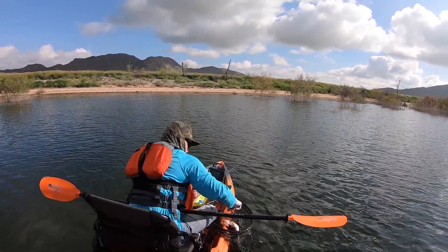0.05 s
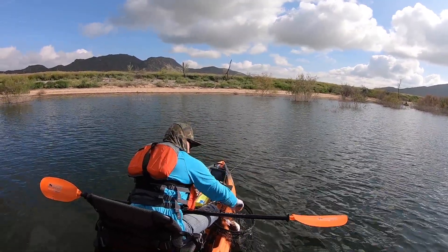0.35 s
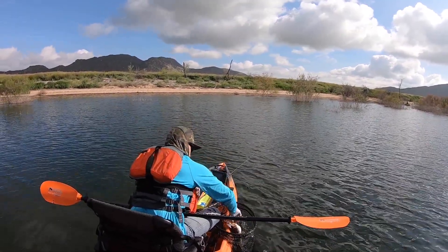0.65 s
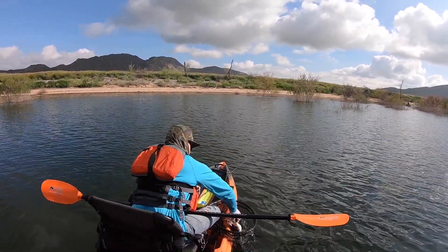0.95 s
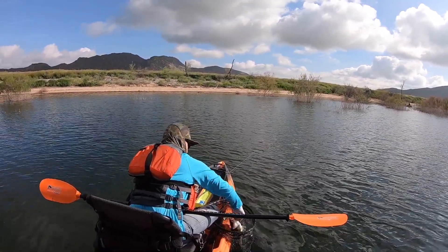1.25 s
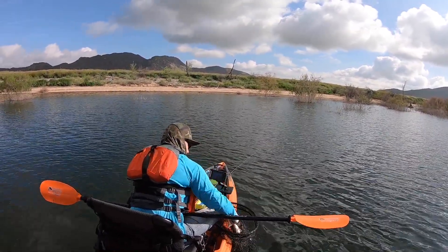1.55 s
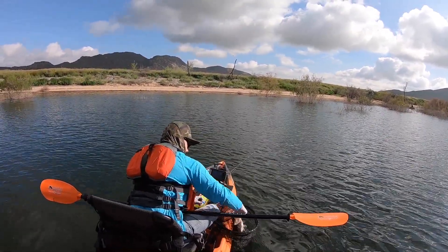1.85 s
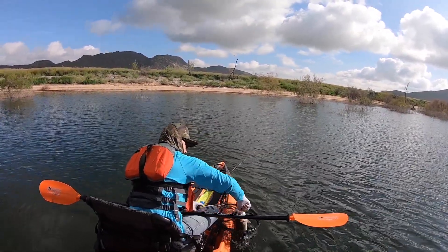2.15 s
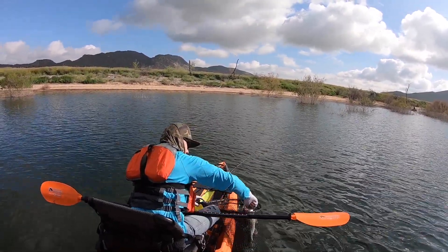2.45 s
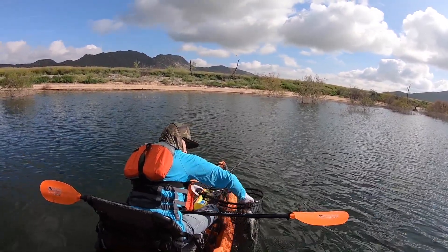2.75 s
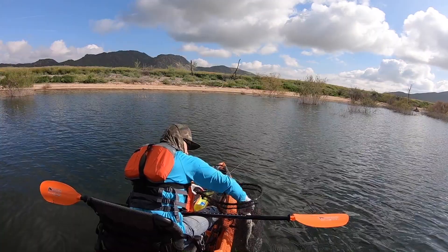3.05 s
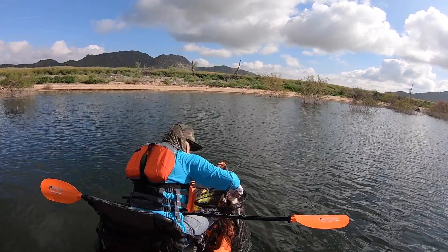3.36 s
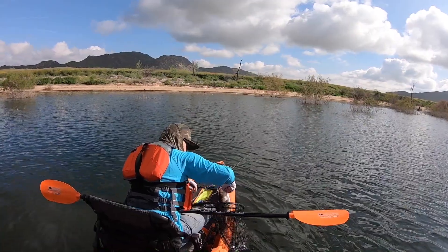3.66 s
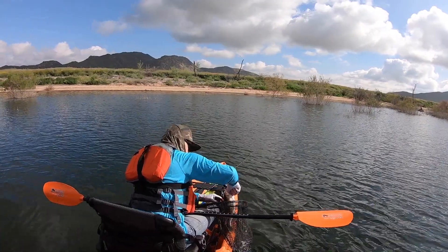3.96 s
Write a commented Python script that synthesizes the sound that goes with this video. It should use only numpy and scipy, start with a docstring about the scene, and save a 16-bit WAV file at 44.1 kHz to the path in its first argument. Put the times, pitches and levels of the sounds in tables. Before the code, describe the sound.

Gear thumps onto a hollow plastic kayak hull near the end, booming and rattling as it bounces. Before that, wind rumbles on the microphone over a low motor hum, with faint ripples, small clicks and distant birds on a lake.

```python
"""Wind rumbles on the microphone over a low, steady motor hum, as a kayak drifts on a lake.
Ripples lap at the hull, a hand splashes, and tiny bubbles ring. Metal tackle clinks, plastic clicks,
a sleeve swishes, and far birds chirp and trill. Near the end comes the loudest sound: a piece of gear
drops on the hollow plastic hull, which booms and rattles as the gear bounces and settles."""
import sys
import numpy as np
from scipy import signal
from scipy.fft import rfft, irfft
from scipy.io import wavfile
from scipy.ndimage import uniform_filter1d

SR = 44100
rng = np.random.default_rng(int(sys.argv[2]) if len(sys.argv) > 2 else 0)


def generate_wav(sig):
    """Save sig (samples, or channels by samples) to the path in sys.argv[1] as 16-bit PCM at SR."""
    pcm = np.round(np.clip(np.atleast_2d(sig).T, -1, 1) * 32767).astype(np.int16)
    wavfile.write(sys.argv[1], SR, pcm)


N = 176400
GEAR_SIDE_DB, WATER_SIDE_DB = -7.5, -11.5  # stereo width: lower is narrower


# The hull's own tones. Each row: pitch in Hz, level in dB, seconds to die away.
HULL_TONES = [(58, -19.5, 1), (86.2, -19, 0.99), (92.8, -14, 0.57), (113.1, 4.5, 0.32), (131.4, -6, 0.27),
              (148.6, -10, 0.41), (194.8, 3.5, 0.14), (235.6, -1.1, 0.092), (266.7, -9.5, 0.15),
              (420, -10.5, 0.1), (445, -0.5, 0.084), (494, -9.5, 0.12), (602, -14.5, 0.13),
              (900.6, -4.5, 0.081)]
# Blows on the hull. Each row: start in seconds, thump in dB, contact time in ms, rattle in dB,
# pitch in Hz that the struck spot favours, dB by which tones far from that pitch are weaker.
BLOWS = [(1.486, -28, 0.99, -49.5, 430, 9.5), (1.507, -35, 0.43, -56.5, 350, 11.5),
         (3.6423, -1, 1.24, -24.5, 121, 1.3), (3.654, -2, 4.3, -38, 99, -0.5),
         (3.6883, 0.2, 0.6, -27, 272, 12), (3.8549, -27, 2.6, -59.5, 91, 9.5),
         (3.9113, -12, 2.15, -60, 199, 13), (3.9444, -17, 3.6, -62, 93, 8)]

def hull():
    """Each blow makes the hollow shell ring, mostly at the tones of the struck spot, and rattle."""
    out, t = np.zeros((2, N)), np.arange(32768) / SR
    tone_rise_s, rattle_rise_s, spot_octaves = 0.0045, 0.00199, 0.52
    tones = np.array([undb(db) * fade(t, s) * np.sin(2 * np.pi * hz * t) for hz, db, s in HULL_TONES])
    tones *= 1 - np.exp(-t / tone_rise_s)
    tones = signal.sosfilt(signal.butter(3, 57, "high", fs=SR, output="sos"), tones)
    for at, db, contact_ms, rattle_db, spot_hz, weaker_db in BLOWS:
        near = bell(np.array(HULL_TONES)[:, 0], spot_hz, spot_octaves)
        ring = undb(weaker_db * (near - 1.5)) @ tones
        deep = signal.sosfilt(signal.butter(2, 63.6, fs=SR, output="sos"), ring)
        push = t * fade(t, 2 * contact_ms / 1000)  # a longer push sounds duller
        thump = signal.fftconvolve(stereo((ring, deep), side_db=-2), push[None] / push.sum())
        add(out, at, -undb(db) * thump[:, :len(t)])
        add(out, at - rattle_rise_s, undb(rattle_db) * rattle(t, rattle_rise_s))
    return out


# The rattle's bands. Each row: frequency in Hz, level in dB, seconds to die away.
RATTLE_BANDS = [(269, -20, 0.2), (362, -15.5, 0.094), (533, 6, 0.18), (890, 3, 0.15), (1160, -3, 0.12),
                (1350, 9, 0.035), (1600, -4.5, 0.092), (1930, 1, 0.079), (3270, -9, 0.056),
                (4740, -25, 0.11), (8060, -42.5, 0.092), (13500, -67, .06)]

def rattle(t, rise_s):
    """Hull and gear ring at so many pitches that they blur into noise; loose gear buzzes on."""
    spectrum = rfft(colour(noise(side_db=-12.5, size=len(t)), RATTLE_BANDS))
    log_hz, centres = np.log(frequencies(len(t))), np.log(np.array(RATTLE_BANDS)[:, 0])
    tail = undb(-23) * fade(t, 0.35)
    ring = 0
    for (_, _, ring_s), this_band in zip(RATTLE_BANDS, np.eye(len(centres))):
        share = np.interp(log_hz, centres, this_band)
        ring += irfft(spectrum * share) * rise(t, rise_s) * (fade(t, ring_s) + tail)
    buzz = band(noise(side_db=-12.5, size=len(t)), hz=2080, octaves=0.21)
    return ring + undb(-25.5) * buzz * fade(t, 0.34)


# Plastic clicks. Each row: start in seconds, level in dB, centre pitch in Hz.
PLASTIC_CLICKS = [(.173, -63, 750), (.225, -60, 1390), (0.8233, -62, 4140), (1.159, -60, 3320),
                  (1.2335, -66, 2280), (1.342, -62, 6400), (1.395, -61.5, 6260), (1.4841, -33, 3240),
                  (1.508, -55, 4130), (1.584, -69, 5450), (1.611, -59.5, 7400), (1.9, -67, 7000),
                  (2.36, -54, 4000), (2.377, -56, 5000), (3.371, -71, 5800), (3.421, -69, 5500),
                  (3.6377, -39, 3560), (3.643, -32, 2430)]

def clicks():
    """Hard plastic gives a dry snap of noise with a faint tail."""
    out, t = np.zeros((2, N)), np.arange(8192) / SR
    rise_s = 0.0024
    snap = fade(np.maximum(t - rise_s, 0), 0.012)
    shape = rise(t, rise_s) * (snap + undb(-18) * fade(t, 0.12))
    for at, db, hz in PLASTIC_CLICKS:
        add(out, at, undb(db) * shape * band(noise(GEAR_SIDE_DB, len(t)), hz, octaves=0.78))
    return out


# The metal's own tones. Each row: pitch in Hz, level in dB, seconds to die away.
TACKLE_TONES = [(4380, -5, 0.034), (5270, -19, .03), (6440, 6.5, 0.066), (7130, 4, .03), (8150, 0, 0.058),
                (9500, 0, 0.046), (12000, -1.5, 0.075), (12400, -9, 0.035)]
# Metal clinks. Each row: start in seconds, level in dB, a factor on the tones' ring time.
TACKLE_CLINKS = [(.1794, -69.5, 1.3), (0.2263, -65, 1.2), (0.2628, -54, 1.3), (0.2734, -66, 1.1),
                 (.3242, -61, .6), (0.3417, -58, .6), (.349, -63, .5), (.4015, -63, .7), (0.414, -66, .7),
                 (.4499, -70, .7), (0.5172, -58.5, .6)]

def tackle():
    """Small metal pieces tick and ring brightly, a little differently each time."""
    out, t = np.zeros((2, N)), np.arange(8192) / SR
    scatter_db, detune = 1.5, 0.018
    for at, db, stretch in TACKLE_CLINKS:
        ring = 0
        for hz, tone_db, ring_s in TACKLE_TONES:
            gain = undb(tone_db + scatter_db * rng.standard_normal((2, 1)))
            phase = 2 * np.pi * hz * (1 + detune * rng.normal()) * t + rng.normal(size=(2, 1))
            ring += gain * fade(t, stretch * ring_s) * np.sin(phase)
        tick = band(noise(side_db=-11.5, size=len(t)), hz=5300, octaves=0.9) * fade(t, 0.071)
        add(out, at, undb(db) * rise(t, 0.0028) * (ring + undb(-1) * tick))
    return out


# Single drips. Each row: start in seconds, level in dB, starting pitch in Hz.
DRIP_NOTES = [(1.004, -42, 3730), (1.015, -49, 2850), (1.612, -44, 7460), (1.975, -62, 2270),
              (2.361, -55, 2210), (2.381, -46, 2500), (2.385, -63, 3500), (2.659, -67.5, 1880),
              (2.872, -58.5, 3000), (3.014, -65, 1620), (3.186, -57.5, 3440), (3.908, -60.5, 2100)]

def drips():
    """Tiny bubbles ring and rise a little in pitch."""
    out = np.zeros((2, N))
    cycles, pitch_gain = 84, 0.26
    for at, db, hz in DRIP_NOTES:
        length = cycles / hz
        t = clock(length)
        ring = np.sin(2 * np.pi * hz * t * (1 + pitch_gain / 2 * t / length))
        add(out, at, undb(db) * rise(t, 0.00046) * fade(t, length) * ring)
    return out


# The tone colour of the ripples. Each row: frequency in Hz, level in dB.
RIPPLE_COLOUR = [(400, -1), (800, -1), (1400, -2), (2200, 3), (3600, 3), (5000, -5), (7500, -4.5),
                 (10000, -26), (14000, -28)]
# How loud the ripples are. Each row: time in seconds, level in dB.
RIPPLE_LOUDNESS = [(0, -74.5), (.15, -77.5), (1.2, -78), (1.45, -67.5), (1.55, -65.5), (1.68, -82.5),
                   (1.95, -74), (2.1, -86), (2.7, -93.5), (3.0, -74), (3.12, -84), (3.4, -64), (3.8, -89)]

def water():
    """Many tiny droplets make the trickling ripples; swells and splashes join them."""
    drops_per_s, spread_db = 1800, 3.2
    hits = rng.random(N) < drops_per_s / SR
    sizes = undb(spread_db * np.minimum(rng.exponential(size=N), 4))
    drops = hits * sizes * noise(WATER_SIDE_DB)
    ripples = colour(drops, RIPPLE_COLOUR) * curve(RIPPLE_LOUDNESS) * undb(0.63 * wander(25))
    return ripples + swells() + splashes(drops)


# Splashes. Each row: peak time in seconds, half-length in seconds, level in dB, centre pitch in Hz.
HAND_SPLASHES = [(0.182, 0.033, -65.5, 586), (0.749, 0.011, -60.5, 3580), (1.002, 0.0068, -80, 4300),
                 (1.015, 0.028, -64.5, 2390), (1.99, 0.015, -74, 2380), (2.379, 0.067, -59, 2580),
                 (2.88, 0.01, -77, 3030), (3.018, 0.0098, -62.5, 2400), (3.171, 0.026, -71.5, 3500)]

def splashes(drops):
    """A hand in the water throws up short sprays of droplets."""
    out = np.zeros((2, N))
    for at, half_s, db, hz in HAND_SPLASHES:
        first = int(max(at - half_s, 0) * SR)
        spray = band(drops[:, first:first + 8192], hz, octaves=0.64)
        shape = np.hanning(int(2 * half_s * SR)) ** 2
        add(out, at - half_s, undb(db) * spray[:, :len(shape)] * shape)
    return out


# The tone colour of the murmur. Each row: frequency in Hz, level in dB.
MURMUR_COLOUR = [(900, -26.5), (1200, -4.5), (1400, 4.5), (1550, -15.5), (1900, -27)]
# Its swells. Each row: peak time in seconds, length in seconds, level in dB.
MURMUR_SWELLS = [(0.624, 0.11, -79), (0.983, 0.13, -75), (1.717, 0.21, -71.5), (2.415, 0.27, -69.5),
                 (2.9, 0.22, -76), (3.528, 0.48, -68.5)]

def swells():
    """A soft murmur of air and water comes and goes."""
    t = np.arange(N) / SR
    level = sum(undb(db) * np.exp(-4 * ((t - at) / length) ** 2) for at, length, db in MURMUR_SWELLS)
    return colour(noise(WATER_SIDE_DB), MURMUR_COLOUR) * level


# Swishes. Each row: peak time in seconds, half-length in seconds, level in dB, centre pitch in Hz,
# width in octaves.
SLEEVE_SWISHES = [(1.245, 0.033, -69, 1890, 0.41), (1.37, 0.033, -60, 1440, 0.59),
                  (1.378, 0.052, -68, 6200, 0.36), (1.472, 0.027, -65, 3180, 1.1),
                  (2.359, 0.072, -66, 4150, 0.65), (3.378, 0.056, -64, 2180, 1.16),
                  (3.483, 0.042, -68, 2390, 0.65), (3.573, 0.085, -66.5, 2770, 0.79),
                  (3.6, 0.025, -71.5, 4200, .07)]

def sleeve():
    """A sleeve brushes over the gear in smooth swishes."""
    out = np.zeros((2, N))
    for at, half_s, db, hz, octaves in SLEEVE_SWISHES:
        shape = np.hanning(int(2 * half_s * SR))
        rub = band(noise(GEAR_SIDE_DB, size=16384), hz, octaves)
        add(out, at - half_s, undb(db) * rub[:, :len(shape)] * shape)
    return out


# Chirps. Each row: start in seconds, length in seconds, first and last pitch in Hz, level in dB.
BIRD_CHIRPS = [(.1, 0.053, 6900, 7450, -68.5), (0.343, 0.038, 4490, 5800, -64.5),
               (0.38, 0.043, 3790, 3870, -64.5), (0.542, 0.023, 4550, 4660, -67),
               (0.565, 0.021, 3030, 3400, -67), (0.59, 0.019, 3770, 3880, -59.5),
               (0.674, 0.067, 4200, 4230, -69), (0.742, 0.048, 4880, 4540, -59.5),
               (0.791, 0.047, 3660, 3470, -68), (0.996, 0.072, 3860, 3750, -69)]

def songbirds():
    """Thin chirps and fainter, more distant twitters, blurred by the echo from the shore."""
    out, t = np.zeros((2, N)), np.arange(16384) / SR
    for at, length, from_hz, to_hz, db in BIRD_CHIRPS:
        add(out, at, undb(db) * whistle(length, from_hz, to_hz))
    for at, hz, size in rng.uniform((0.3, 3400, 0.5), (0.8, 5200, 1.5), size=(16, 3)):
        add(out, at, undb(-80) * size * whistle(0.05, hz, 0.8 * hz))
    echo = rng.standard_normal((2, len(t))) * fade(t, 0.091)
    return out + signal.fftconvolve(out, echo / np.linalg.norm(echo[0]), axes=1)[:, :N]


# The pips of a trill. Each row: peak time in seconds, level in dB.
TRILL_PIPS = [(1.665, -57), (1.741, -59), (1.784, -56.5), (1.832, -61), (1.871, -60), (1.91, -58.5),
              (1.95, -64), (1.992, -64), (2.03, -61.5), (2.067, -70), (2.105, -63.5), (2.141, -64),
              (2.177, -63), (2.214, -68), (2.252, -66), (2.289, -64), (2.366, -63), (2.404, -64),
              (2.441, -65), (2.477, -62), (2.515, -62), (2.553, -62), (2.589, -63), (2.626, -59)]

def trilling_bird():
    """A far bird repeats a short falling pip, and the whole trill sinks in pitch."""
    out = np.zeros((2, N))
    start_hz, end_hz, settle_s, pip_s, fall = 966, 824, 0.21, 0.013, 0.079
    for at, db in TRILL_PIPS:
        hz = end_hz + (start_hz - end_hz) * np.exp(-(at - TRILL_PIPS[0][0]) / settle_s)
        pip = whistle(pip_s, hz * (1 + fall), hz * (1 - fall), arch=0, rough=0)
        add(out, at - pip_s / 2, undb(db) * pip)
    return out


# Tone colours of the rumble both ears share, the rumble that differs between them, and the hiss.
# Each row: frequency in Hz, level in dB.
RUMBLE_COLOUR = [(12, -15), (28, -4.5), (65, -1.5), (120, -3.5), (200, -9), (290, -17), (380, -25),
                 (550, -36.5), (800, -48.5), (2000, -74)]
RUMBLE_SIDE_COLOUR = [(12, -15), (28, -10.5), (55, -16), (90, -13), (140, -18.5), (250, -24), (500, -35.5),
                      (2000, -48.5)]
HISS_COLOUR = [(300, 7), (750, -5.5), (1000, -0.5), (1350, 2.5), (2000, -8.5), (4000, -8), (6000, -8.5),
               (8000, -4), (9300, -13.5), (11000, -19.5), (14000, -32.5)]
# How loud the rumble is. Each row: time in seconds, level in dB.
RUMBLE_LOUDNESS = [(0, -44.5), (.6, -44.5), (1.25, -48), (1.55, -43), (1.95, -44), (2.5, -46), (2.85, -42),
                   (3.15, -43.5), (3.62, -40.5), (3.8, -38.5), (4, -36)]

def wind():
    """Gusts rumble on the microphone, with the thin hiss of open air above them."""
    middle = colour(rng.standard_normal(N), RUMBLE_COLOUR)
    side = colour(rng.standard_normal(N), RUMBLE_SIDE_COLOUR)
    gusts = curve(RUMBLE_LOUDNESS) * undb(1.3 * wander(5.77))
    hiss = undb(-68.5) * colour(noise(side_db=-1), HISS_COLOUR)
    return stereo((middle, side), side_db=-10) * gusts + hiss


# The motor's tones. Each row: multiple of the shaft's turning rate, early and late level in dB.
MOTOR_TONES = [(4, -50, -49), (8, -43.5, -39.5), (10, -52.5, -59.5), (15, -60, -63), (16, -49.5, -52.5),
               (17, -61.5, -68), (18, -60, -63.5)]

def motor():
    """A turning shaft hums in wavering tones, whose balance shifts partway through."""
    shaft_hz, drift, waver_db, shift_span_s = 17.78, 0.0011, 0.5, (1.48, 2)
    angle = 2 * np.pi * np.cumsum(shaft_hz * (1 + drift * wander(3.05))) / SR
    hum, t = np.zeros(N), np.arange(N) / SR
    for multiple, early_db, late_db in MOTOR_TONES:
        db = np.interp(t, shift_span_s, (early_db, late_db)) + waver_db * wander(4.51)
        hum += np.sqrt(2) * undb(db) * np.sin(multiple * angle + rng.uniform(0, 2 * np.pi))
    return hum


def whistle(length, from_hz, to_hz, arch=0.03, rough=0.038):
    """One gliding bird note; arch lifts the pitch midway and rough makes it unsteady."""
    progress = clock(length) / length
    hump = np.sin(np.pi * progress)
    quiver = np.interp(progress, np.linspace(0, 1, 32), rng.standard_normal(32))
    hz = (from_hz + (to_hz - from_hz) * progress) * (1 + arch * hump + rough * quiver)
    return hump * np.sin(2 * np.pi * np.cumsum(hz) / SR)


def undb(db):
    """Turn decibels into a gain."""
    return 10 ** (np.asarray(db) / 20)


def unit(x):
    """Scale to an average strength (rms) of 1."""
    return x / np.sqrt(np.mean(x ** 2) + 1e-30)


def clock(length):
    """Sample times over a length in seconds."""
    return np.arange(max(int(length * SR), 8)) / SR


def curve(rows):
    """A gain that follows (seconds, dB) points."""
    return undb(np.interp(np.arange(N) / SR, *np.array(rows).T))


def rise(t, seconds):
    """Climb from 0 to 1 in this time, then hold."""
    return np.minimum(t / seconds, 1)


def fade(t, seconds):
    """Die away by 60 dB in this time."""
    return np.exp(-np.log(1000) * t / seconds)


def frequencies(size):
    """The frequencies in Hz of a spectrum, never below 1."""
    return np.maximum(np.fft.rfftfreq(size, 1 / SR), 1)


def bell(hz, centre_hz, octaves):
    """A weight of 1 at the centre pitch, falling on both sides."""
    return np.exp(-.5 * (np.log2(hz / centre_hz) / octaves) ** 2)


def colour(x, rows):
    """Shape a sound's spectrum along (Hz, dB) points, at strength 1."""
    hz, db = np.array(rows)[:, :2].T
    log_hz = np.log(frequencies(x.shape[-1]))
    beyond = np.abs(log_hz - np.clip(log_hz, np.log(hz[0]), np.log(hz[-1])))
    gain = undb(np.interp(log_hz, np.log(hz), db) - 20 * beyond)
    return unit(irfft(rfft(x) * gain, x.shape[-1]))


def band(x, hz, octaves):
    """Keep the part of a sound around one pitch, at strength 1."""
    return unit(irfft(rfft(x) * bell(frequencies(x.shape[-1]), hz, octaves), x.shape[-1]))


def stereo(pair, side_db):
    """Both ears share the first signal; the second is added left and subtracted right."""
    return pair[0] + undb(side_db) * pair[1] * np.array([[1], [-1]])


def pan(x, right_db):
    """Make the right ear louder than the left by this much."""
    return x * undb(np.array([[-right_db], [right_db]]) / 2)


def noise(side_db, size=N):
    """White stereo noise."""
    return stereo(rng.standard_normal((2, size)), side_db)


def wander(per_s):
    """Smoothed random steps with a spread near 1."""
    hold = int(SR / per_s)
    steps = rng.standard_normal(256)[np.arange(N) // hold % 256]
    return unit(uniform_filter1d(uniform_filter1d(steps, hold), hold))


def add(out, start, x):
    """Mix a sound in at a time in seconds."""
    i = int(np.clip(start * SR, 0, N - 1))
    out[:, i:i + x.shape[-1]] += x[..., :N - i]


def scene():
    """Everything heard from the back of the kayak, in the open air."""
    lake = wind() + motor() + pan(water(), right_db=2.5) + drips()
    boat = hull() + pan(clicks() + tackle(), right_db=3)
    return lake + boat + songbirds() + trilling_bird() + sleeve()


def record(dry):
    """Clip the loudest peak and cut the treble above 14200 Hz."""
    return signal.sosfilt(signal.ellip(8, .2, 70, 14200, fs=SR, output="sos"), np.clip(dry, -1, 1))


dry = scene()
out = record(dry)
generate_wav(out)
```